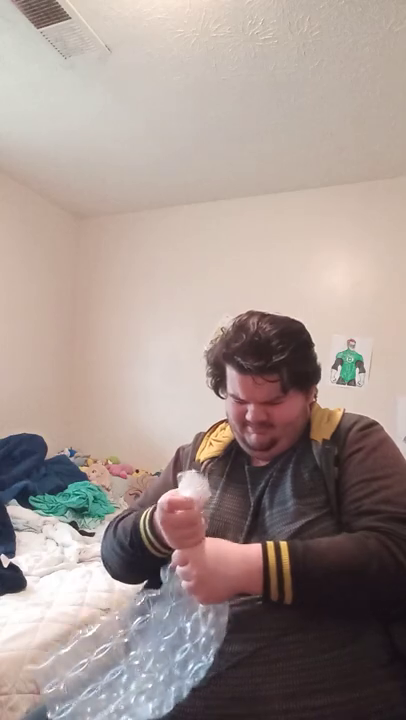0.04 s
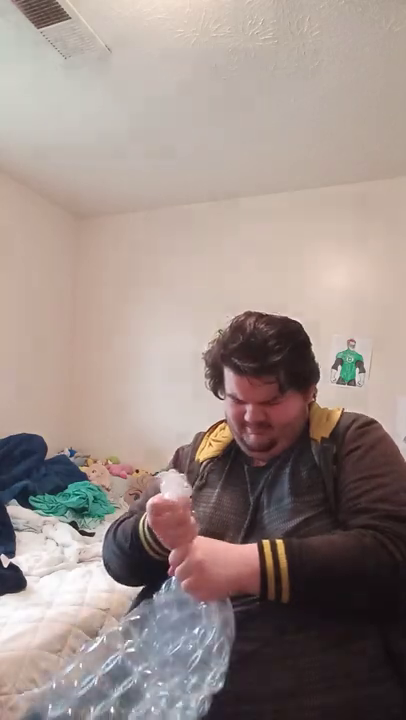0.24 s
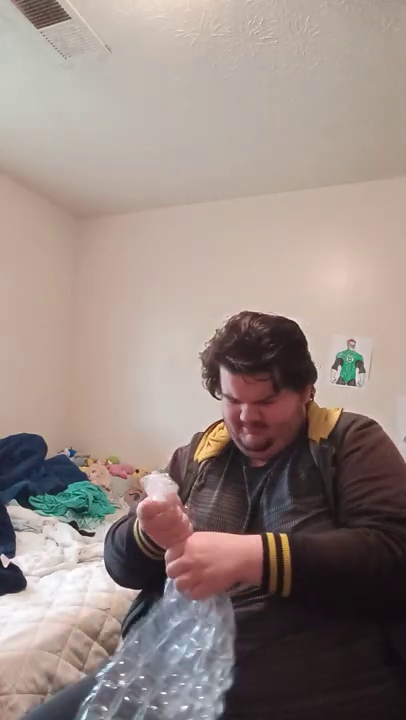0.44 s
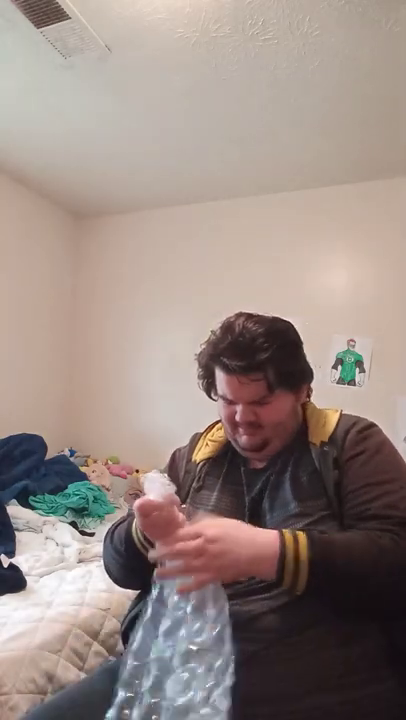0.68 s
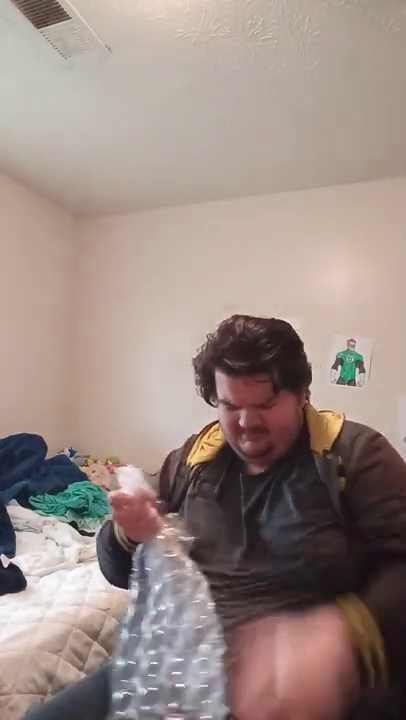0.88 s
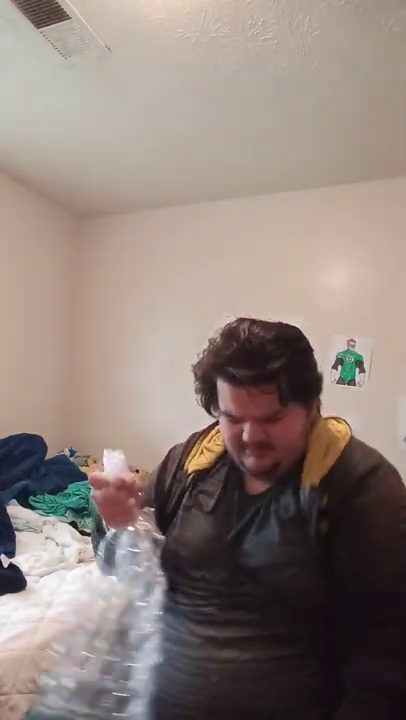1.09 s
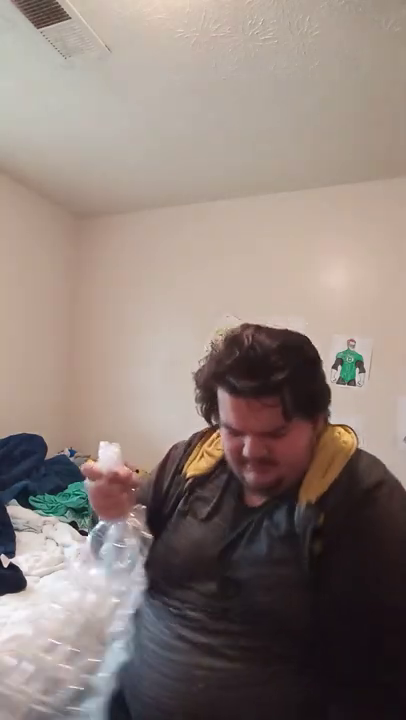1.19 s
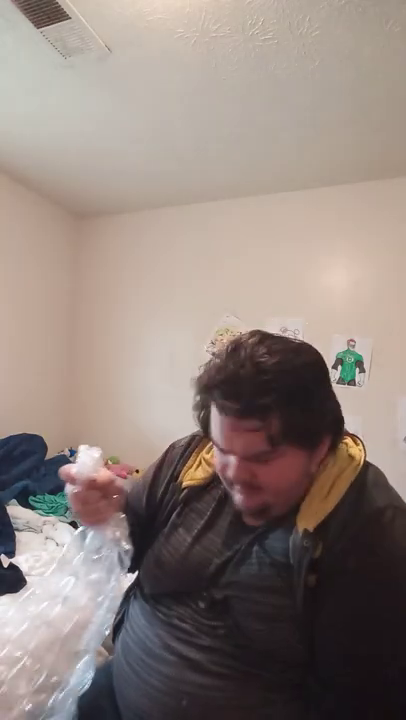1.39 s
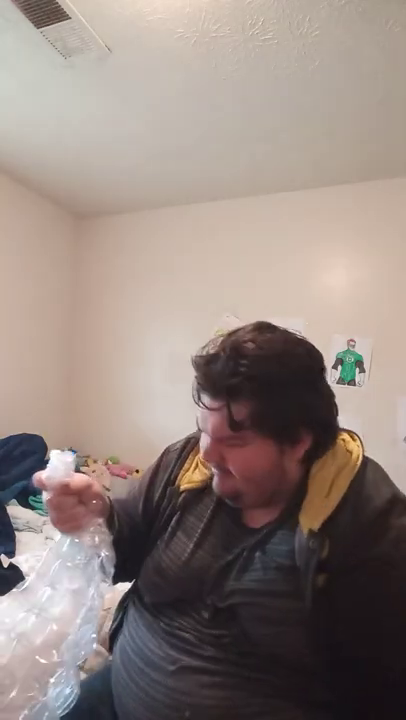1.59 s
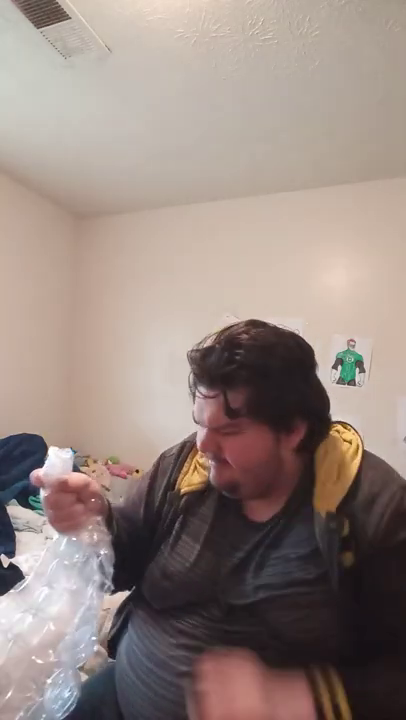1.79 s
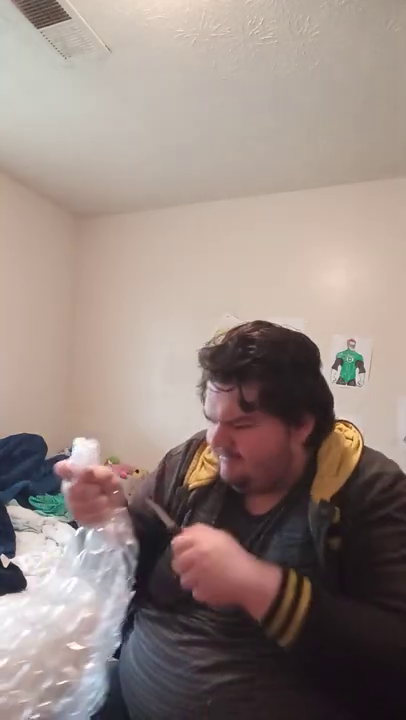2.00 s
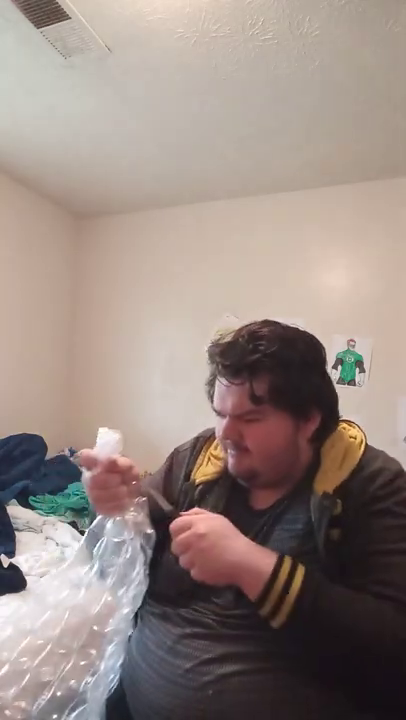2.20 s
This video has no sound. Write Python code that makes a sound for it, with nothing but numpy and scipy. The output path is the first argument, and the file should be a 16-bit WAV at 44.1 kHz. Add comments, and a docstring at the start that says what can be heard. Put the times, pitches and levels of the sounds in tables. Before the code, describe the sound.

Bubble wrap pops in a small bedroom: sharp cracks at 0 and 0.1 seconds, then a huge bright burst at 0.2, its ring squashed by the microphone's limiter. From 0.45 to 0.85 the grip loosens with hiss, crinkles and dull film snaps. Lighter crackles follow around 0.9-1.1, another flurry with flicks at 1.3-1.7, faint squeaks and soft cloth bumps, then near silence with faint steady room noise to 2.0.

```python
"""Bubble wrap popping: small bubbles pop, then a big one bursts and the recorder ducks its ring in a small bedroom.
Each pop is a sharp pulse ringing torn skin and room. As the wringing grip lets go, film hisses and snaps dully.
Showers of tiny clicks make the sheet crinkle as it swings aside, slide through the palm and squeak.
Low, soft bumps brush clothes and bedding, over a faint steady floor of coloured noise."""
import sys
import numpy as np
from scipy import signal
from scipy.fft import rfft, irfft
from scipy.io import wavfile
from scipy.ndimage import uniform_filter1d, minimum_filter1d

SR = 44100
rng = np.random.default_rng(int(sys.argv[2]) if len(sys.argv) > 2 else 0)


def pcm_store(signal):
    """Save signal as 16-bit PCM."""
    levels = np.round(np.clip(np.atleast_2d(signal), -1, 1) * 32767)
    wavfile.write(sys.argv[1], SR, levels.astype(np.int16).T)


N = 99225  # 2.25 s

# Bursting bubbles. Each row: start in seconds, level in dB, bass shelf in dB, treble shelf in dB,
# ring pitch in Hz, ring level in dB.
BUBBLE_POPS = [(-.035, -9, -5, -2.5, 3000, -14.5), (.0846, -26, -4, 11.5, 2800, -11.5),
               (.117, -4.5, -7.5, 3.5, 3700, -22), (.1235, -17, -4, -1.5, 3700, -14.5),
               (0.2045, 30, -4.5, 6, 5460, -19)]
# Spectrum of a pop. Each row: frequency in Hz, level in dB.
POP_SPECTRUM = [(40, -44), (120, -23), (300, -5.5), (700, -5.5), (1400, -5), (2500, -3), (3700, 3),
                (5500, -0.5), (7000, -10), (10000, -26.5), (15000, -19.5)]
# Slack film snapping over. Each row: start in seconds, level in dB, pitch in Hz, damping as 1/Q.
FILM_SNAPS = [(0.528, -10, 3740, 1.1), (0.6, -12, 640, 1.2), (0.6392, 2.5, 1670, 2.16),
              (0.7305, -7.5, 3920, 0.59), (0.7387, -6.5, 885, 0.7), (0.768, -10.5, 2010, 0.52),
              (0.793, -3.5, 1710, 2.7), (0.7949, -6.5, 410, 0.4), (0.8057, -10.5, 453, 1.1),
              (0.928, -22, 540, 0.48), (.974, -19, 610, 1.9), (1.056, -21, 1310, 0.98),
              (1.456, -13.5, 400, 1.2), (1.411, -3.5, 2720, 0.52), (1.511, -11.5, 1300, 1.5),
              (1.532, -11.5, 584, 1.1), (1.668, -19, 2920, 0.44), (1.682, -21.5, 580, 0.3)]
# Fine ticks of the film unsticking. Each row: start in seconds, level in dB.
UNSTICKING_TICKS = [(.449, -62), (0.496, -32), (.510, -43), (.721, -38)]
# Crinkles of the sheet. Each row: start in seconds, length in seconds, level in dB,
# bass shelf in dB, treble shelf in dB.
SHEET_CRINKLES = [(0.053, 0.11, -52, -16, -24), (0.408, 0.11, -47, -13.5, 2), (0.545, 0.055, -48, -15, 14),
                  (0.593, 0.047, -45.5, -3, 12), (0.663, 0.059, -44.5, 4, 8),
                  (0.719, 0.046, -41, -1.5, 4.5), (0.823, 0.12, -55, 2, 6), (0.907, 0.036, -44.5, 3.5, -8),
                  (0.959, 0.034, -43.5, -3, -1.5), (1.051, 0.017, -36.5, -4, 2.5),
                  (1.109, 0.14, -60.5, -28, -10), (1.274, 0.018, -42.5, 0, -15),
                  (1.289, 0.034, -38, 4.5, -1.5), (1.329, 0.096, -40, 2.5, -4),
                  (1.387, 0.0041, -29.5, -11, 6.5), (1.405, 0.017, -33.5, -6, 3),
                  (1.476, 0.02, -34, 1.5, 1.5), (1.509, 0.018, -46, 7, -18), (1.58, 0.073, -68.5, 1, 11),
                  (1.662, 0.029, -50, -7, -2.5), (1.719, 0.17, -70.5, -24, 11.5)]
# Spectrum of crinkling film. Each row: frequency in Hz, level in dB.
FILM_SPECTRUM = [(60, -42.5), (150, -28), (280, -16), (420, 3), (650, 2.5), (1100, 0.5), (1800, 2.5),
                 (2700, 1.5), (4200, -3), (5600, -7), (7300, -14), (10000, -33.5), (15000, -28)]
# Film sliding through the palm. Each row: start in seconds, length in seconds, level in dB.
PALM_SLIDES = [(0.458, 0.015, -48), (0.49, 0.0035, -35.5), (0.511, 0.081, -56.5), (0.567, 0.075, -43),
               (0.658, 0.025, -48.5), (0.701, .12, -52.5), (0.978, 0.018, -51.5), (1.15, 0.18, -69),
               (1.188, 0.026, -57), (1.846, 0.029, -70), (1.954, .04, -78.5)]
# Spectrum of the sliding hiss. Each row: frequency in Hz, level in dB.
SLIDE_SPECTRUM = [(500, -49), (3000, 3), (6000, 4.5), (8000, -1.5), (10500, -14.5), (15000, -5.5)]
# Film squeaking faintly under the fingers. Each row: start in seconds, length in seconds,
# level in dB, pitch in Hz.
FILM_SQUEAKS = [(.076, 0.0091, -48, 1150), (1.145, 0.1, -59, 2004), (1.59, 0.071, -62, 2140),
                (1.62, 0.153, -77, 1740), (1.953, 0.031, -67, 1680), (1.968, .03, -71, 1960)]
# Soft bumps of arm and sheet on clothes and bedding. Each row: start in seconds, length in seconds,
# level in dB, pitch in Hz.
SOFT_BUMPS = [(0.703, 0.035, -48, 174), (1.205, 0.017, -53, 383), (1.215, 0.032, -55, 204),
              (1.44, 0.018, -48.5, 134), (1.49, 0.046, -49, 254), (1.56, 0.09, -59.5, 150),
              (1.815, 0.066, -62, 255)]
# Early reflections off near surfaces. Each row: delay in seconds, level in dB before wet level and fade.
EARLY_REFLECTIONS = [(.001, -10.5), (.0054, -3.5), (.008, -9), (0.0113, -9), (.022, -5.5)]
# Standing waves of the room. Each row: frequency in Hz, level in dB before wet level and fade.
STANDING_WAVES = [(137, -16.5), (218, -20), (402, -16.5), (452, -17.5), (564, -19), (630, -24.5),
                  (810, -20), (1660, -21.5), (2630, -17.5), (2865, -23), (3438, -13)]
# Decay of the diffuse tail before any extra fade. Each row: frequency in Hz, 60 dB decay time in seconds.
TAIL_DECAY = [(100, 0.079), (500, 0.38), (2000, 0.35), (4500, 0.33), (8000, 0.29), (15000, 0.15)]
# Spectrum of the steady background. Each row: frequency in Hz, level in dB.
FLOOR_SPECTRUM = [(30, -21), (90, -8.5), (190, 3), (500, -1.5), (1500, -8.5), (3000, -14.5), (6000, -15),
                  (10000, -28), (15000, -28.5)]

# Damping is 1/Q: small values ring, large values thud
POP_DAMPING, TICK_DAMPING, SQUEAK_DAMPING, BUMP_DAMPING = 0.13, 0.35, 0.048, 0.38
SNAP_LOW_HZ, SNAP_TOP_HZ, TICK_HZ = 268, 5240, 13500
CREASES_PER_S, CREASE_SPREAD_DB = 1400, 6  # average rate, standard deviation of size
ATTACK_S, RELEASE_S = 0.0042, 0.0045  # linear rise, time constant of the fall
# Sounds at the hands are drier than the hanging sheet
SNAP_ROOM_DB, BUMP_ROOM_DB, SQUEAK_ROOM_DB = -5.5, -5, -7
HANDLING_FADE_DB_PER_S = 43.5  # the quiet handling sounds die away sooner than the pops
# Tail level before wet level and fade, time constants of its build-up and of echo scatter, mode decay
TAIL_DB, TAIL_BUILD_S, SCATTER_S, MODE_T60_S = 4.5, 0.0012, 0.0023, 0.088
FLOOR_DB = -71.5
LIMIT_DB, LOOKAHEAD_DB_PER_S, HOLD_S, RECOVER_S = -7, 1099, 0.049, 0.055
CEILING = 0.75  # amplitude where peaks round off
LOW_CUT_HZ, TOP_HZ = 65, 15800


def pops():
    """Each bursting bubble is one sharp, bright pulse that rings its own torn skin and the room."""
    out, response = np.zeros(N), room()
    for start, db, bass_db, treble_db, ring_hz, ring_db in BUBBLE_POPS:
        ring = undb(ring_db) * resonate(response, ring_hz, POP_DAMPING)
        burst = colour(response + ring, POP_SPECTRUM, bass_db, treble_db)
        add(out, start, undb(db) * burst)
    return out


def snaps():
    """Slack film flips over with a damped swing, each a click through one broad resonance."""
    out, click = np.zeros(N), signal.unit_impulse(SR // 10)
    band = signal.butter(2, [SNAP_LOW_HZ, SNAP_TOP_HZ], "band", fs=SR, output="sos")
    for start, db, hz, damping in FILM_SNAPS:
        swing = signal.sosfilt(band, resonate(click, hz, damping))
        add(out, start, -undb(db) * in_room(swing, SNAP_ROOM_DB))  # minus: the pulse is inverted
    return out


def ticks():
    """Film unsticks in tiny ticks, all one very high, damped click."""
    out, click = np.zeros(N), signal.unit_impulse(SR // 10)
    tick = in_room(resonate(click, TICK_HZ, TICK_DAMPING), SNAP_ROOM_DB)
    for start, db in UNSTICKING_TICKS:
        add(out, start, undb(db) * tick)
    return out


def crinkles():
    """Creases crackle all over the moving sheet, each movement heard from its own spot."""
    out = np.zeros(N)
    for start, length, db, bass_db, treble_db in SHEET_CRINKLES:
        crackle = colour(creases(length), FILM_SPECTRUM, bass_db, treble_db)
        add(out, start, undb(db) * in_room(crackle))
    return out


def slides():
    """Film hisses through the palm as dense clicks with a bright spectrum."""
    hiss = np.zeros(N)
    for start, length, db in PALM_SLIDES:
        add(hiss, start, undb(db) * colour(creases(length), SLIDE_SPECTRUM))
    return in_room(hiss)[:N]


def squeaks():
    """Taut film rubbed by the fingers rings narrow resonances."""
    return rubs(FILM_SQUEAKS, SQUEAK_DAMPING, SQUEAK_ROOM_DB)


def bumps():
    """Cloth and bedding answer a rub with low, well damped resonances."""
    return rubs(SOFT_BUMPS, BUMP_DAMPING, BUMP_ROOM_DB)


def rubs(rows, damping, wet_db):
    """Rubbing contacts: dense clicks ring one resonance, kept to the octave around it."""
    out = np.zeros(N)
    for start, length, db, hz in rows:
        octave = [hz / np.sqrt(2), hz * np.sqrt(2)]
        band = signal.butter(2, octave, "band", fs=SR, output="sos")
        rub = signal.sosfilt(band, resonate(creases(length), hz, damping))
        add(out, start, undb(db) * rub)
    return in_room(out, wet_db)[:N]


def creases(length):
    """Dense clicks of uneven size during one movement."""
    env = stroke(length)
    n = len(env)
    happens = rng.random(n) < CREASES_PER_S / SR
    sign = rng.choice([-1, 1], n)
    size_db = CREASE_SPREAD_DB * np.clip(rng.standard_normal(n), -2, 2)
    clicks = happens * sign * undb(size_db)
    return env * unit(clicks) * np.sqrt(n)


def stroke(length):
    """Attack, hold and release of one movement."""
    t = np.arange(SR // 4) / SR
    attack = np.minimum(t / ATTACK_S, 1)
    return attack * np.exp(-np.maximum(t - length, 0) / RELEASE_S)


def in_room(x, wet_db=0):
    """A handling sound heard from its own spot in the room."""
    return signal.fftconvolve(x, room(wet_db, HANDLING_FADE_DB_PER_S))


def room(wet_db=0, fade_db_per_s=0):
    """Direct sound, near surfaces, standing waves and a diffuse tail, drawn afresh for each spot."""
    n = SR // 2
    t = np.arange(n) / SR
    response = undb(TAIL_DB) * unit(diffuse_tail(n) * (1 - np.exp(-t / TAIL_BUILD_S)))
    for delay, db in EARLY_REFLECTIONS:
        scatter = rng.standard_normal(n) * np.exp(-t / SCATTER_S)
        add(response, delay, undb(db) * unit(scatter))
    mode_decay = np.exp(-np.log(1000) * t / MODE_T60_S)
    for hz, db in STANDING_WAVES:
        wave = np.sin(2 * np.pi * (hz * t + rng.random()))
        response += undb(db) * unit(wave * mode_decay)
    direct = signal.unit_impulse(n)
    return direct + response * undb(wet_db - fade_db_per_s * t)


def diffuse_tail(n):
    """Noise split into overlapping octaves, each dying at its own rate."""
    t, hz = np.arange(n) / SR, np.arange(n // 2 + 1) * SR / n
    noise = rfft(rng.standard_normal(n))
    centres = 62.5 * 2. ** np.arange(9)
    tail = np.zeros(n)
    for centre, share in zip(centres, np.eye(len(centres))):
        weight = on_log(hz, list(zip(centres, share)))  # a triangle that peaks at this octave
        decay = np.exp(-np.log(1000) * t / on_log(centre, TAIL_DECAY))
        tail += irfft(noise * weight, n) * decay
    return tail


def background():
    """A faint steady floor of coloured noise."""
    return undb(FLOOR_DB) * colour(rng.standard_normal(N), FLOOR_SPECTRUM)


def undb(db):
    """Decibels to gain."""
    return 10 ** (np.asarray(db) / 20)


def unit(x):
    """Scale to unit energy."""
    return x / np.sqrt(np.sum(x ** 2))


def on_log(hz, points):
    """Read (Hz, value) points on a log-frequency axis."""
    f, v = np.array(points, float).T
    return np.interp(np.log(hz + 0.00058), np.log(f), v)  # the offset avoids log of zero


def colour(x, points, bass_db=0, treble_db=0):
    """Minimum-phase filter with the given spectrum, shelved at both ends."""
    hz = np.arange(2049) * SR / 4096
    shelves = on_log(hz, [(500, bass_db), (1800, 0.0065), (3000, 0.0037), (9000, treble_db)])
    shape = undb(on_log(hz, points))
    level = np.sqrt(np.mean(shape ** 2))
    cepstrum = irfft(np.log(shape / level * undb(shelves)))
    # Folding the cepstrum forward makes the filter causal
    cepstrum[1:2048] *= 2
    cepstrum[2049:] = 0
    return signal.fftconvolve(x, irfft(np.exp(rfft(cepstrum))))[:len(x)]


def resonate(x, hz, damping):
    """One resonance that keeps the energy of a click."""
    w = 2 * np.tan(np.pi * hz / SR)  # warped so the pitch stays true after the bilinear step
    b, a = signal.bilinear([1, 0], [1, damping * w, w * w])
    ring = unit(signal.lfilter(b, a, signal.unit_impulse(4096)))
    return signal.fftconvolve(x, ring)[:len(x)]


def add(out, start, x):
    """Mix x in at a time in seconds; it may begin before zero."""
    i = int(round(start * SR))
    x = x[max(-i, 0):len(out) - i]
    out[max(i, 0):max(i, 0) + len(x)] += x


def scene():
    """Pops and handling sounds in the room, over the faint background."""
    film = pops() + snaps() + ticks() + crinkles() + slides() + squeaks()
    return (film + bumps() + background())[None]


def record(dry):
    """A look-ahead limiter ducks, holds and recovers; peaks are rounded and both ends of the spectrum are cut."""
    t = np.arange(N) / SR
    power = uniform_filter1d(dry[0] ** 2, size=200)
    level_db = 10 * np.log10(np.abs(power) + 1e-12)
    half = int(HOLD_S * SR / 2)
    held = minimum_filter1d(np.minimum(LIMIT_DB - level_db, 0), 2 * half + 1, origin=half)
    recovery = np.exp(-t / RECOVER_S)
    gain_db = np.minimum.accumulate(held / recovery) * recovery
    # Run backwards, so the gain slopes down ahead of a peak
    slope_db = LOOKAHEAD_DB_PER_S * t
    gain_db = np.minimum.accumulate((gain_db + slope_db)[::-1])[::-1] - slope_db
    wet = CEILING * np.tanh(dry * undb(gain_db) / CEILING)
    wet = signal.sosfilt(signal.butter(2, LOW_CUT_HZ, "high", fs=SR, output="sos"), wet)
    return signal.sosfilt(signal.ellip(8, .2, 70, TOP_HZ, fs=SR, output="sos"), wet)


dry = scene()
out = record(dry)
pcm_store(out)
```